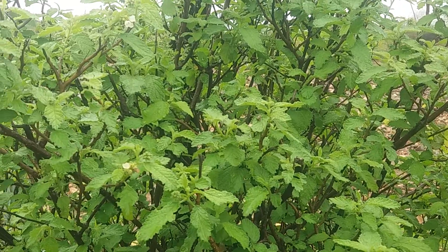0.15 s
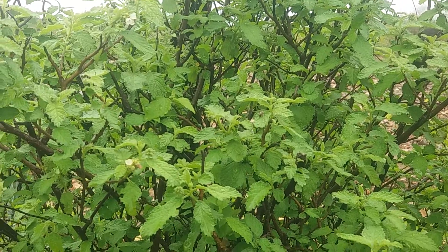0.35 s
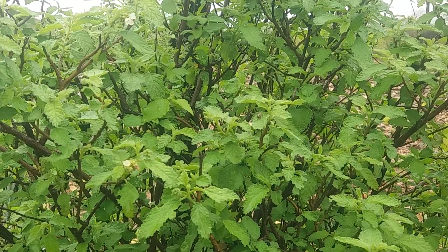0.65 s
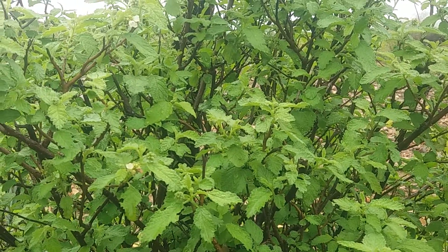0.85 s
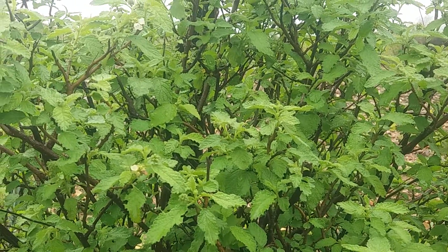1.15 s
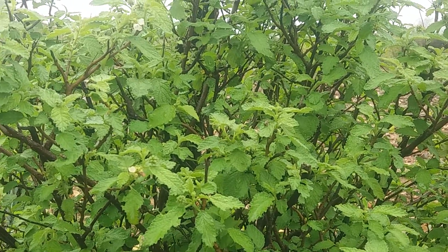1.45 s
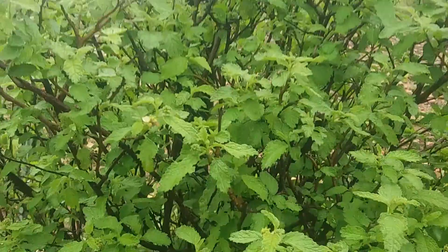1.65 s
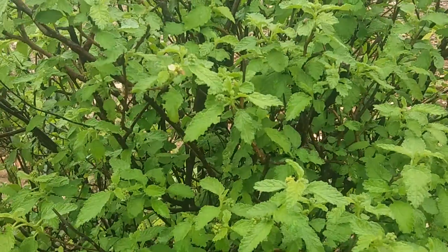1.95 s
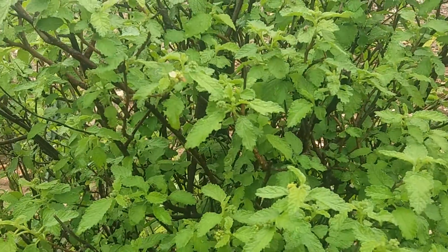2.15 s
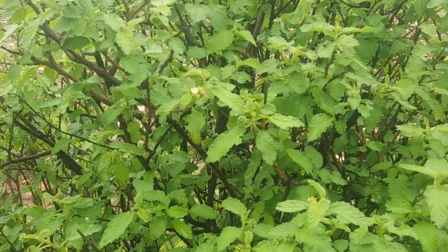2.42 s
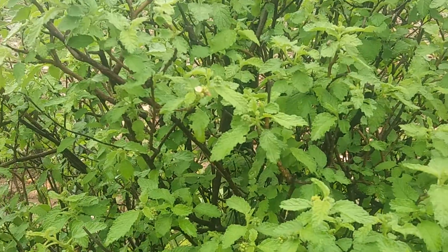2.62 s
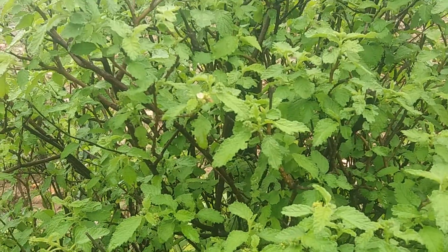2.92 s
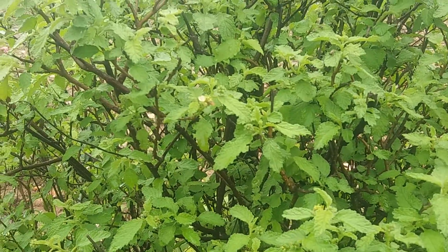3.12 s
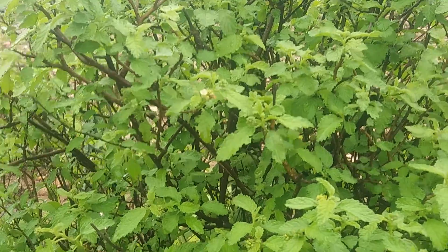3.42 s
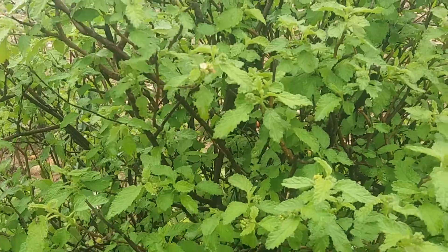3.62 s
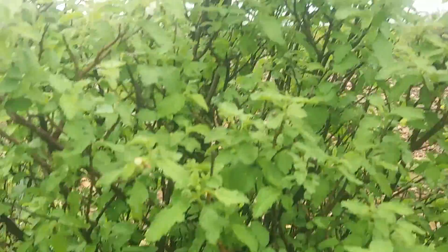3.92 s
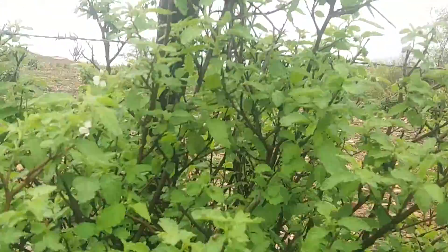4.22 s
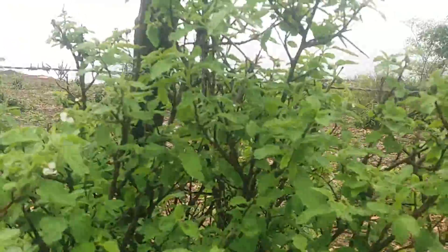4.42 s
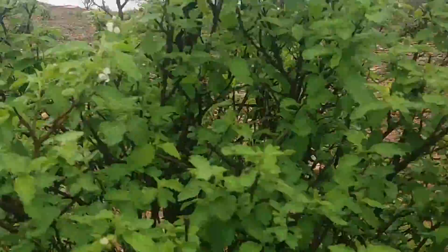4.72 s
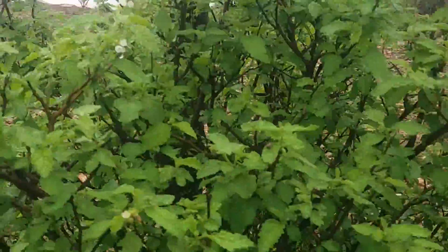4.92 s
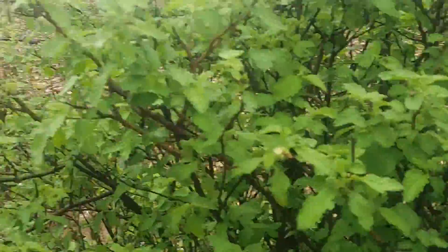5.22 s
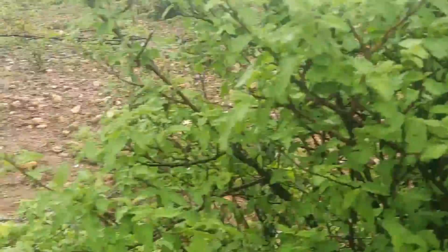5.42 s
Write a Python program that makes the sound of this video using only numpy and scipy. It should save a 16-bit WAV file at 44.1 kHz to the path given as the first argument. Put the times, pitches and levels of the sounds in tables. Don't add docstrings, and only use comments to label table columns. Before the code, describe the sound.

An outdoor mono recording of a bird chorus in bushes: fast, mid-high, reedy chirps with quick rises and falls, mixed with warbling calls and lower short pips. A lively opening eases a little in the middle, then fills up again until the abrupt end. Leaves blur the calls slightly. Soft dull thumps from fingers on the device come and go, and a single loud crack interrupts midway.

```python
import sys
import numpy as np
from scipy import signal
from scipy.io import wavfile
from scipy.ndimage import uniform_filter1d

SR = 44100
rng = np.random.default_rng(int(sys.argv[2]) if len(sys.argv) > 2 else 0)


def bounce(signal):
    frames = np.transpose(np.atleast_2d(signal))
    limited = np.clip(frames, -1, 1)
    pcm = np.round(limited * 32767).astype(np.int16)
    wavfile.write(sys.argv[1], SR, pcm)


def attenuation_scalar(level_db):
    decades = np.asarray(level_db, float) / 20
    return 10 ** decades


N = 245195


def evened(x):
    return x / np.sqrt(np.mean(x ** 2) + 1e-20)


def read(points, hz):
    f, value = np.transpose(points)
    return np.interp(np.log(hz + 1), np.log(f + 1), value)


def add(mix, s, sound):
    at = round(s * SR)
    sound = sound[max(-at, 0):]
    part = mix[max(at, 0):][:len(sound)]
    part += sound[:len(part)]


# pitch_hz, level_db
THROAT_COLOUR = [(700, -29), (1200, -24.5), (1600, -5.5), (2000, -5.5), (2400, 1), (3000, 0), (3600, -6),
                 (4400, -2), (4900, -10.5), (5500, -9), (6200, -15.5), (7200, -25.5), (9000, -54),
                 (12000, -58)]
# time_s, level_db
FOLIAGE_SHADE = [(0, -5.5), (.6, -8.5), (1.2, -10), (2, -10.5), (2.6, -6.5), (3.3, -6.5), (3.8, -15),
                 (4.2, -9), (4.8, -8), (5.56, -11)]


def chirp(top_s, top_hz, rise, fall, db, warble_s, third_db, higher_db, luck):
    t = np.arange(-rise, fall, 1 / SR)
    rising = t < 0
    away = np.where(rising, -t / rise, t / fall)

    plain = warble_s < -rise
    climb = 0.14 * away ** 2.5 if plain else 0.17 * away ** 3
    sliding = warble_s > 0.018 or (fall > 0.086 and db < -30)
    if sliding:
        drop = 0.17 * away ** 1.5
    else:
        drop = 0.2 * away ** (2 if plain else 2.5)

    warble_hz, warble_dip_share, warble_dip_db = 102, 0.18, 12
    warbling = np.clip((warble_s - t) / 0.005, 0, 1)
    beats = warble_hz * (1 + 0.0426 * luck) * (t - warble_s)
    dip = warbling * np.sin(np.pi * beats) ** 4
    hz = top_hz * (1 - np.where(rising, climb, drop))
    hz = hz * (1 + warble_dip_share * (0.258 * warbling - dip))
    unsteady_breath = evened(uniform_filter1d(rng.standard_normal(len(t)), 150))
    hz = hz * (1 + 0.0036 * unsteady_breath)
    turns = np.cumsum(hz) / SR

    order = np.arange(1, 8)[:, None]
    colour_db = read(THROAT_COLOUR, order * hz) + third_db * (order == 3) + higher_db * (order > 3)
    shade_db = np.interp(top_s, *np.transpose(FOLIAGE_SHADE))
    colour_db = colour_db + shade_db * (order > 4) - 4 * (order > 5)
    colour_db = colour_db - 2.34 * order * away ** 2

    knots = rng.standard_normal((7, len(t) // 500 + 2))
    knot_time = np.arange(len(t)) / 500
    flicker = np.array([np.interp(knot_time, np.arange(len(k)), k) for k in knots])
    colour_db = colour_db + 2.5 * flicker
    voice = (attenuation_scalar(colour_db) * np.sin(2 * np.pi * order * turns)).sum(0)

    onset = np.clip((t + rise) / 0.003, 0, 1)
    release = np.clip((fall - t) / 0.004, 0, 1)
    swell = np.where(rising, 1 - 0.043 * away ** 2, (1 - away ** 2.1) ** 0.068)
    effort = onset * swell * attenuation_scalar(-warble_dip_db * dip) * release
    core_rms = np.sqrt(np.mean(voice[away < 0.6] ** 2))
    return top_s - rise, attenuation_scalar(db) * voice / core_rms * effort


# top_s, top_pitch_hz, rise_s, fall_s, level_db
LONG_WARBLES = [(0.074, 1063, 0.06, 0.081, -40), (0.335, 1058, 0.054, 0.061, -38),
                (0.357, 1143, 0.078, 0.083, -37), (0.572, 1055, 0.058, 0.063, -41),
                (0.683, 1163, 0.061, 0.079, -39.5), (0.83, 1071, 0.048, 0.12, -48.5),
                (2.25, 1117, 0.029, 0.059, -46), (3.407, 1144, 0.043, 0.052, -43),
                (3.625, 1144, 0.051, 0.044, -42.5), (4.402, 1160, 0.052, 0.068, -40.5),
                (4.874, 987, 0.026, 0.029, -38.5), (5.021, 990, 0.06, 0.046, -39.5),
                (5.18, 974, 0.041, 0.057, -41.5), (5.479, 1010, 0.03, 0.043, -43.5)]
BRIEF_WARBLES = [(0.058, 1153, 0.091, 0.056, -37.5), (0.135, 1164, 0.04, 0.088, -44),
                 (2.499, 1151, 0.07, 0.047, -43.5), (4.512, 1142, 0.047, 0.066, -42),
                 (1.014, 1192, 0.058, 0.068, -38), (1.273, 1218, 0.036, 0.076, -44),
                 (1.568, 1220, 0.045, 0.05, -43.5), (4.786, 1136, 0.059, 0.061, -42),
                 (5.056, 1148, 0.062, 0.062, -40.5), (5.315, 1159, 0.06, 0.063, -44.5)]
EXCITED_TRILLS = [(0.123, 1225, 0.032, 0.098, -42.5), (0.41, 1196, 0.03, 0.1, -40.5),
                  (0.712, 1208, 0.055, 0.094, -42.5), (3.844, 1158, 0.038, 0.1, -42.5),
                  (4.119, 1158, 0.037, 0.082, -42), (4.65, 1159, 0.038, 0.11, -42),
                  (4.93, 1155, 0.039, 0.1, -40), (5.235, 1150, 0.045, 0.1, -45),
                  (5.533, 1165, 0.041, 0.09, -45)]
# start_s, top_pitch_hz, length_s, level_db, facing_brightness_db
HIGH_CHIRPS = [(0.482, 1147, 0.079, -44.5, 5), (0.876, 1114, 0.067, -50.5, -2),
               (1.164, 1107, 0.062, -54.5, -6), (1.5, 1120, .112, -46, 7), (1.729, 1098, 0.095, -57.5, -3),
               (1.823, 1189, 0.097, -46.5, 7), (2.016, 1090, 0.085, -54, -4),
               (2.132, 1140, 0.085, -47.5, -1), (2.335, 1162, 0.071, -45.5, 4.5),
               (2.544, 1160, .079, -45, -1), (2.71, 1107, 0.078, -44.5, -7.5),
               (2.75, 1170, 0.063, -44, -0.5), (4.26, 1104, .09, -41.5, -4),
               (2.954, 1082, 0.073, -45, -4.5), (2.955, 1114, .089, -52.5, -1),
               (3.153, 1160, 0.0713, -46.6, -0.5)]
MIDDLE_CHIRPS = [(0.797, 1048, 0.085, -45.5, -4), (0.92, 1065, .068, -56, 3), (1.201, 1080, 0.074, -49, -1),
                 (1.607, 1074, 0.052, -43, -3.5), (1.914, 1040, 0.055, -48, 0),
                 (2.034, 995, 0.041, -47, -11.5), (2.06, 1063, 0.054, -48.5, 4),
                 (3.311, 1010, 0.037, -48.5, -8), (3.667, 1040, 0.058, -44.5, -1),
                 (3.751, 1049, .068, -45, 4), (3.992, 1062, .072, -44.5, -1),
                 (4.23, 1008, 0.051, -44.5, -3), (4.497, 1028, .075, -47, -2), (4.673, 1006, 0.039, -49, 4),
                 (5.426, 1059, 0.023, -49, 4.5)]
LOW_PIPS = [(0.559, 970, 0.053, -56, 14), (1.07, 952, .054, -48, -1), (1.203, 877, .039, -49.5, -5),
            (1.518, 873.6, .039, -47.5, -2), (1.857, 862.4, 0.058, -56, -2), (2.133, 860, 0.041, -55, -15),
            (2.593, 820, 0.032, -55, -4), (2.665, 950, .044, -47, -5), (2.848, 979, .044, -46.5, -5),
            (2.923, 845, 0.092, -60, -8), (3.234, 912, .028, -49, -5.5), (3.339, 960, 0.079, -46.5, 0.5),
            (3.532, 885, 0.02, -46.5, -1), (3.749, 904, 0.047, -46, 0), (3.89, 896, .045, -48.5, -5),
            (4.028, 900, 0.041, -48.5, -4), (2.76, 837, .045, -57, -10), (4.16, 905, .057, -49, -5),
            (4.436, 946, 0.046, -44.5, -3.5), (4.717, 969, .051, -40.5, 2), (5.309, 997, .065, -44, -3)]
LAZY_CHIRPS = [(1.015, 1018, 0.0715, -47.5, -20), (1.354, 1119, 0.065, -44, -2),
               (1.432, 1118, 0.072, -54, -1), (1.625, 1125, 0.056, -54.5, -8),
               (1.708, 918, 0.049, -50.5, -6), (1.815, 1020, 0.054, -45, -10),
               (2.296, 1090, 0.062, -55, -11.5), (2.313, 953, 0.062, -50, -6),
               (3.045, 947, 0.057, -49, -8.5), (3.17, 1081, .065, -46.5, -5),
               (3.486, 1039, 0.08, -44, -4.5), (3.863, 1040, 0.054, -40.5, -2),
               (4.055, 1030, 0.06, -42.5, -6.5), (4.285, 918, 0.06, -47, -10.5),
               (4.562, 952, 0.065, -44, -4), (5.371, 1035, 0.062, -47, -1)]
# top_pitch_hz, lean_db
LOW_VOICE_LEAN = [(880, 3.5), (1030, 0.17)]


def covey():
    third_db, higher_db = -1.5, 0
    calls = []
    for row in LONG_WARBLES:
        lean_db = read(LOW_VOICE_LEAN, row[1])
        calls.append((*row, -0.002, third_db + lean_db, higher_db - lean_db))
    for row in BRIEF_WARBLES:
        calls.append((*row, -0.017, third_db, higher_db))
    for row in EXCITED_TRILLS:
        warble_end_s = 0.0202 + 0.2466 * row[3]
        calls.append((*row, warble_end_s, -1, 0.5))

    # calls, fixed rise in s, rise as a share of length
    voices = [(HIGH_CHIRPS, 0.0222, 0), (MIDDLE_CHIRPS, 0.0218, 0),
              (LOW_PIPS, 0.0174, 0), (LAZY_CHIRPS, 0, 0.454)]
    for table, rise_s, share in voices:
        for s, hz, length, db, bright_db in table:
            rise = rise_s + share * length
            fall = max(length - rise, 0.008)
            lean_db = read(LOW_VOICE_LEAN, hz)
            calls.append((s + rise, hz, rise, fall, db, -1, bright_db + lean_db, bright_db - lean_db))

    out = np.zeros(N)
    for call, luck in zip(calls, rng.standard_normal(len(calls))):
        add(out, *chirp(*call, luck))
    return out


def scatter(x, t60):
    t = np.arange(SR // 2) / SR
    taps = rng.choice([-1., 1.], len(t)) * (rng.random(len(t)) < 0.05)
    taps = taps * attenuation_scalar(-60 * t / t60) * (t > 0.004)
    taps = signal.lfilter([1], [1, -0.5], taps)
    return signal.fftconvolve(x, taps / np.linalg.norm(taps))[:N]


# time_s, leaf_echoes_db, far_chorus_db
BUSH = [(0, -4, 7), (.5, 3, 1), (1.101, 4, 3), (1.6, -5, -1.5), (2.3, 4, 0.5), (3, -0.5, 1),
        (3.7, -3, -7.5), (4.3, 1.5, -0.5), (5, 1, 4), (5.56, 4, 5.5)]


def thicket(column):
    rows = np.transpose(BUSH)
    return attenuation_scalar(np.interp(np.arange(N) / SR, rows[0], np.minimum(rows[column], 2)))


def far_birds(near, count=160):
    out = np.zeros(N)
    for k, u, luck in zip(range(count), rng.random((count, 4)), rng.standard_normal(count)):
        top_s = (k + 2 * u[0]) / count * N / SR
        top_hz, fall = 890 + 300 * u[1], 0.04076 + 0.06 * u[2]
        add(out, *chirp(top_s, top_hz, 0.045, fall, -6 * u[3], 0.01487, -1.2, -5.5, luck))

    memory_s, joins_db, slope = 0.015, -46, 1.15
    keep = np.exp(-1 / (memory_s * SR))
    start = -keep ** 2 * near[:2000].var()
    state = [near[:2000].var(), start]
    heard = signal.lfilter([(1 - keep) ** 2], [1, -2 * keep, keep ** 2], near ** 2, zi=state)[0]
    heard_db = 10 * np.log10(heard + 1e-7)
    blurred = evened(3.0 * evened(out) + evened(scatter(out, 0.088)))
    return blurred * attenuation_scalar(-53 + slope * np.minimum(heard_db - joins_db, 0))


def ring(db, hz, t60, sag=0):
    t = np.arange(SR // 5) / SR
    turns = hz * (t + sag * 0.0022 * (1 - np.exp(-t / 0.00075)))
    soft_start = 1 - np.exp(-t / 0.00061)
    return attenuation_scalar(db - 60 * t / t60) * np.sin(2 * np.pi * turns) * soft_start


# time_s, peak_db, ring_hz
FINGER_BUMPS = [(0.173, -33, 100), (0.466, -34.5, 91.5), (0.914, -34.5, 109), (1.041, -39, 79),
                (1.127, -39, 114), (1.27, -34.5, 85), (1.584, -34, 120), (1.758, -49, 61.9),
                (2.793, -35.5, 114), (2.845, -35.5, 121), (3.03, -39.5, 110), (3.492, -40, 82),
                (3.757, -39.5, 220), (4.377, -43, 145), (4.749, -37.5, 172), (4.892, -40.5, 187),
                (5.227, -38.5, 160), (5.367, -37, 220)]
# time_s, peak_db, ring_hz, t60_s, direction (sign)
HARD_KNOCK = [
    (2.4759, -20.5, 230, 0.021, -1),
    (2.4806, -9.5, 820, 0.0038, 1),
    (2.4806, -48, 6700, 0.0046, 1),
    (2.474, -31.5, 1530, 0.0049, 1),
    (2.4793, -38, 90, 0.062, 1),
    (2.4928, -38, 1370, 0.0065, 1),
    (2.497, -46, 170, 0.037, -1),
]


def handling():
    out = np.zeros(N)
    for s, db, hz in FINGER_BUMPS:
        add(out, s, ring(db + 0.5, hz, 0.036, sag=2.58))
    for s, db, hz, t60, direction in HARD_KNOCK:
        add(out, s, np.sign(direction) * ring(db + 6.0, hz, t60))
    return out


# start_s, length_s, from_hz, to_hz, buzz_hz, level_db
SONG_NOTE = (0, .15, 6620, 6640, 350, -73)


def songbird():
    s, length, from_hz, to_hz, buzz_hz, db = SONG_NOTE
    t, out = np.arange(0, length, 1 / SR), np.zeros(N)
    turns = np.cumsum(from_hz + (to_hz - from_hz) * t / length) / SR
    buzz = 1.2 * np.sin(2 * np.pi * buzz_hz * t)
    add(out, s, attenuation_scalar(db) * np.sin(np.pi * t / length) * np.sin(2 * np.pi * turns + buzz))
    return out


# pitch_hz, density_db (per Hz)
AIR_COLOUR = [(40, -3.5), (60, 2.5), (150, -1), (400, -5), (700, -12.5), (870, -7.5), (980, -10.5),
              (1100, -9), (1300, -13), (2500, -12), (5000, -27.5), (7000, -38), (9000, -38.5),
              (16000, -39.5)]


def air():
    frames, hz = N // 256 + 5, np.fft.rfftfreq(1024, 1 / SR)
    a, b, patches = rng.standard_normal((frames, 513, 3)).T
    patches = evened(uniform_filter1d(uniform_filter1d(patches, 10, 0), 12, 1))
    gusts = evened(uniform_filter1d(rng.standard_normal(frames), 5))
    bass = 1 / (1 + (hz[:, None] / 500) ** 2)
    field_db = read(AIR_COLOUR, hz)[:, None] + 0.83 * patches + 0.48 * gusts * bass
    noise = signal.istft((a + 1j * b) * attenuation_scalar(field_db), nperseg=1024, noverlap=768)[1][:N]
    return attenuation_scalar(-53.5) * evened(noise)


def scene():
    near = covey()
    leaves = attenuation_scalar(-16) * scatter(near, 0.05) + attenuation_scalar(-28.5) * scatter(near, 0.7)
    birds = near + thicket(column=1) * leaves + thicket(column=2) * far_birds(near)
    mono = birds + songbird() + air() + handling()
    return np.array([mono, mono])


def band_limit(x):
    return signal.sosfilt(signal.butter(12, 16360, fs=SR, output="sos"), x)


def record(dry):
    cut = signal.sosfilt(signal.butter(6, 48, "high", fs=SR, output="sos"), dry)
    return band_limit(cut - 0.0006)


dry = scene()
out = record(dry)
bounce(out)
```